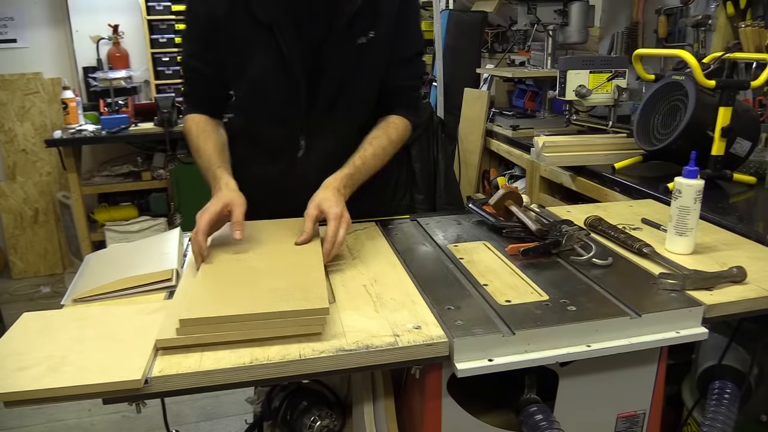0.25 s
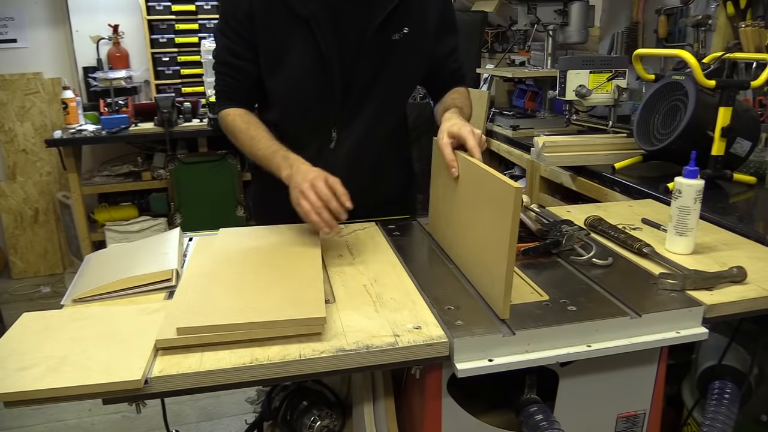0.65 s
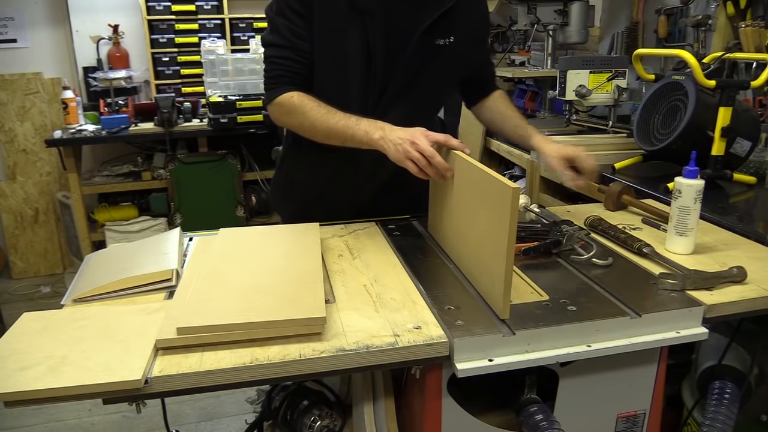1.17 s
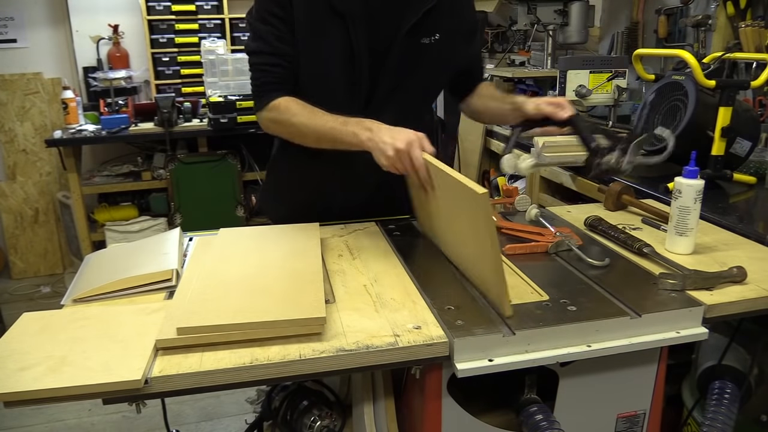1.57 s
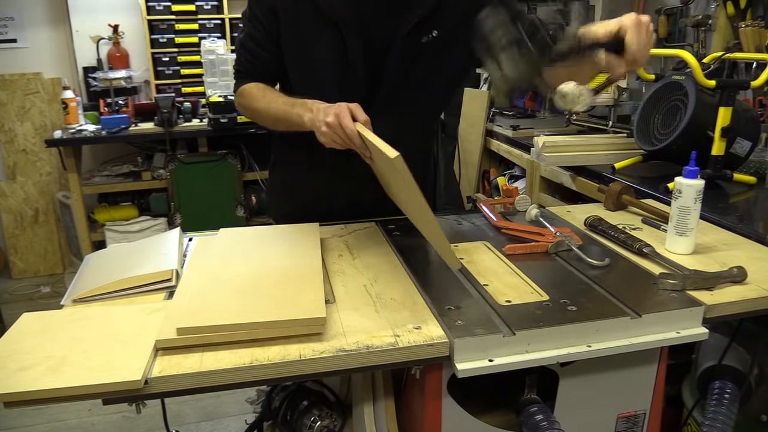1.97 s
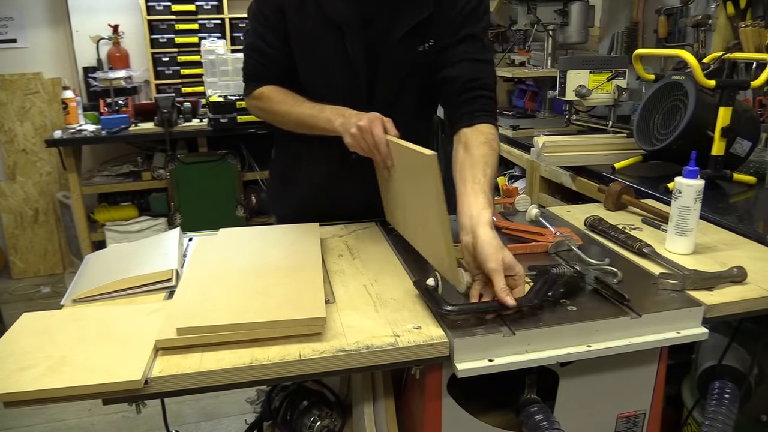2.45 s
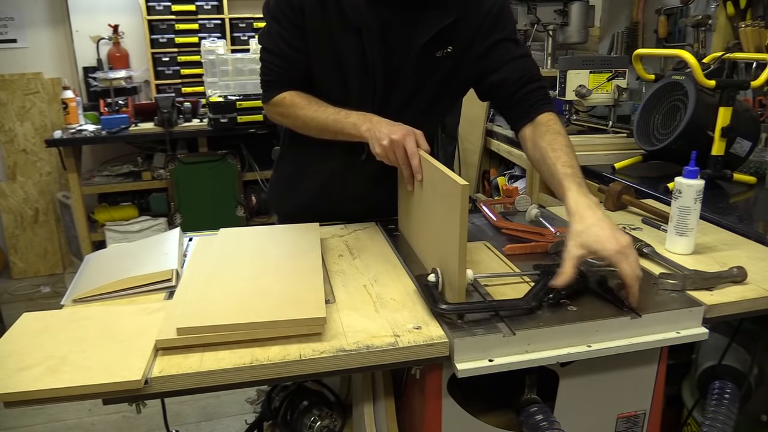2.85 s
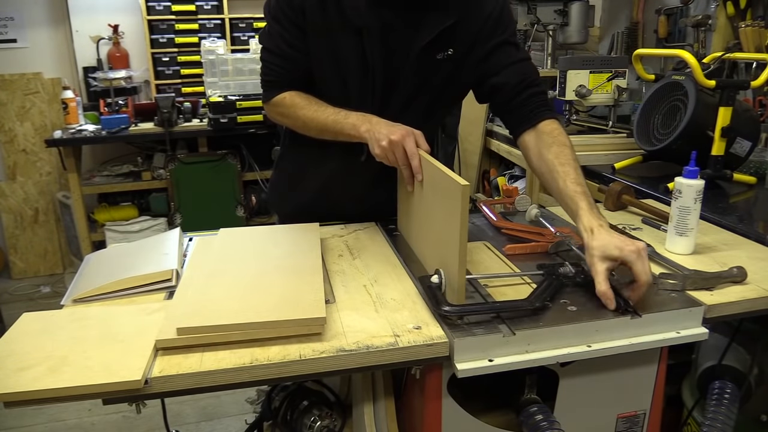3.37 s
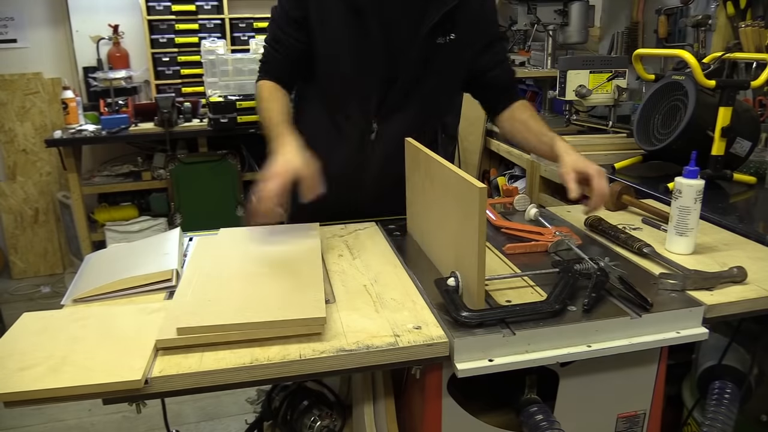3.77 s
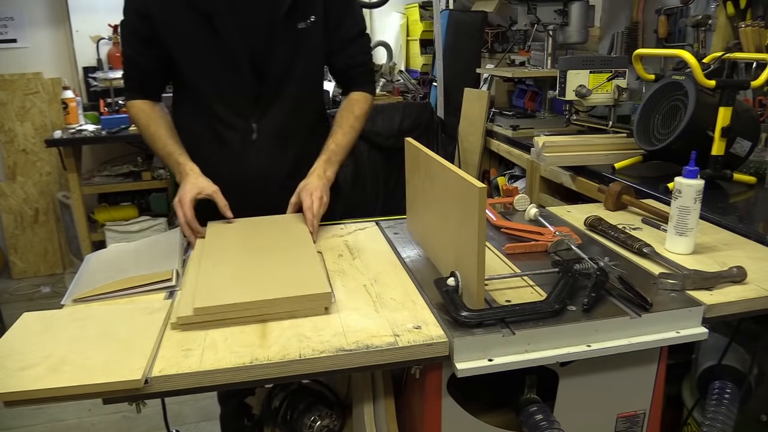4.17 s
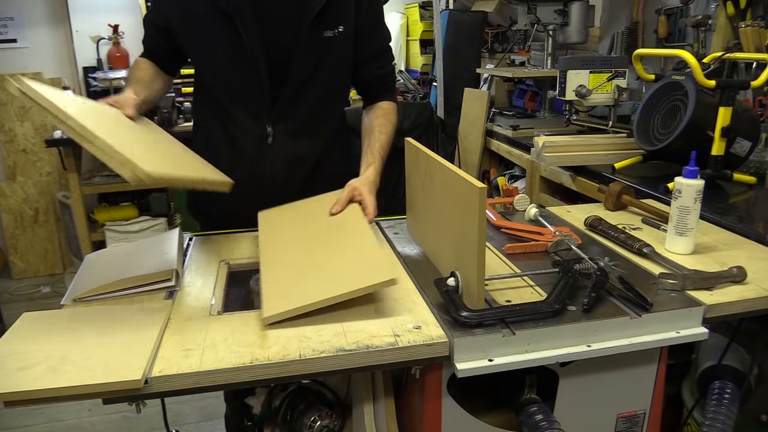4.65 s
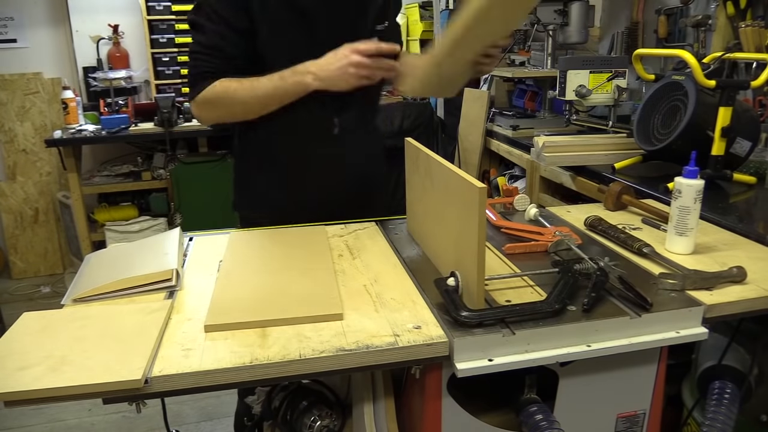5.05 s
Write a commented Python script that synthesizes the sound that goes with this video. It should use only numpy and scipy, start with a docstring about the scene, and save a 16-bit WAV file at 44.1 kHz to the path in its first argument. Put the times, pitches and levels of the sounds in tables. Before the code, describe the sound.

A fibreboard panel brushes off a stack and knocks several times as it is stood on an iron saw table. Steel clamps are picked up, their loose handles clinking, then set down and scraped over the iron in short jerks, the hollow cabinet booming softly below. More panels slide with a hiss, squeal briefly and clack together. The sounds are close and fairly dry, in a quiet workshop with a faint machine hum.

```python
"""Fibreboard panels slide off a stack on a wooden bench; one is stood on an iron saw table.
Each blow cracks, thuds and rings the table top; the hollow saw cabinet booms when pushed.
Steel clamps are picked up, clink their loose handles, are set down and scrape over the iron in
stick-slip jerks. More panels hiss off the stack, squeal at the edge and clack against each other.
Behind it all: a quiet workshop with a faint machine hum."""
import sys
import numpy as np
from scipy import signal
from scipy.fft import rfft, irfft, next_fast_len
from scipy.io import wavfile

SR = 44100
rng = np.random.default_rng(int(sys.argv[2]) if len(sys.argv) > 2 else 0)


def waveform_to_disk(signal):
    """Save audio, clipped to [-1, 1], as 16-bit WAV at the path in sys.argv[1]."""
    frames = np.transpose(np.atleast_2d(signal))
    scaled = np.clip(frames, -1, 1) * 32767
    samples = np.round(scaled).astype(np.int16)
    wavfile.write(sys.argv[1], SR, samples)


N = 234111
TIME_S = np.arange(N) / SR
AGE_S = TIME_S[:SR // 4]

# Table levels are relative: each source adds its own gain.
# room air spectrum: f/Hz, level/dB
AIR_SPECTRUM = [(25, -20), (50, -28), (100, -17.5), (200, -5), (300, -4.5), (480, 1.5), (600, -7), (690, 3),
                (800, -8.5), (1200, -6.5), (1700, -13.5), (5500, -15), (11000, -23), (16000, -28.5)]
# machine hum partials: f/Hz, level/dB
HUM_PARTIALS = [(140, -67), (275, -68.5), (301, -67), (484, -78.5)]
# panels and clamps hit bench and table (one faint row at 0.493 s is a gritty catch in a slide), harder =
# higher: t/s, crack/dB, centre/Hz, narrowness, thud/dB
KNOCKS = [(0.1176, -27, 5530, 1.07, -27), (0.224, -24, 4000, 1.2, -58), (.493, -46, 3500, 1.4, -55),
          (.6906, -18.5, 1710, 0.7, -17.5), (.724, -14.5, 1880, 0.98, -14.5),
          (1.0042, -31, 5900, 0.73, -37.5), (1.0123, -19.5, 11600, 0.6, -25.5),
          (1.1241, -6, 3830, 2.7, -21.5), (1.1789, -23, 6200, 0.7, -33), (1.39, -52, 2980, 0.52, -44),
          (1.4272, -16.5, 6000, 1.43, -19), (1.444, -17, 7300, 0.53, -20), (1.4495, -22, 5330, 1.7, -21.5),
          (1.5149, -14, 13800, 1.13, -22.5), (1.5405, -51, 9050, 1.4, -47), (2.4527, -13, 13900, 1.16, -42),
          (2.458, -11.5, 6500, 1.38, -25), (2.526, -45, 6050, 0.78, -44.5),
          (2.5762, -19.5, 9200, 1.14, -33), (2.5897, -9, 3800, 1.05, -16.5),
          (2.679, -28.5, 10800, 0.49, -39.5), (2.78, -34, 7500, 0.85, -48), (2.794, -22, 9900, 0.97, -53),
          (2.853, -27.5, 5300, 1.1, -33.5), (2.9811, -17, 15000, 1.12, -47),
          (3.033, -25.5, 10100, 0.68, -53), (3.1413, -18.5, 6300, 1.16, -34), (3.178, -19.5, 14500, 1, -53),
          (3.241, -26, 6500, 1.1, -53), (3.355, -28, 6500, 1.7, -32), (3.4908, -28.5, 5540, 0.86, -37),
          (3.5912, -24.5, 13100, 0.96, -61), (4.328, -46, 5000, 0.72, -37), (4.481, -40, 3000, 0.6, -37.5)]
# board hits board: t/s, crack/dB, centre/Hz, narrowness, thud/dB
CLACKS = [(4.059, -35.5, 4830, 1.7, -38), (4.7453, -21, 5300, 1.1, -58), (4.8111, -13, 6400, 1.18, -39),
          (4.831, -21, 6060, 1.3, -49), (4.841, -29.5, 3500, 1.1, -40), (4.8917, -17, 4600, 0.65, -23.5)]
# resonances and one notch common to all blows: f/Hz, width/Hz, gain/dB
BLOW_MODES = [(238, 22, 15.5), (520, 100, 2), (696, 110, 7), (1035, 560, -4.5), (1404, 61, 7),
              (2030, 310, 4), (3160, 430, 0.5), (4680, 340, 4.5)]
# crack bass roll-off: f/Hz, gain/dB
CRACK_ROLLOFF = [(40, -31), (300, -18.5), (1100, -1)]
# thud spectrum: f/Hz, level/dB
THUD_SPECTRUM = [(40, -33), (300, -20), (660, 2.5), (1100, -6), (3000, -37)]
# iron table top modes: f/Hz, level/dB, t60/s
TOP_MODES = [(254, -26, 0.13), (564, -17.5, 0.11), (655, -9.5, 0.075), (687.5, 1, 0.13), (668, -18.5, 0.78),
             (750, -14, 0.084)]
# panel edge drops on the stack: t/s, panel ring/dB, bench thump/dB
PANEL_DROPS = [(0.12, -44, -38), (4.748, -19, -51), (4.89, -18, -43)]
# pushes on the saw cabinet: peak t/s, level/dB
CABINET_PUSHES = [(.14, -48.5), (.73, -47.5), (1.13, -50.5), (1.451, -67), (2.52, -52), (2.62, -41.5),
                  (2.88, -45.5), (3.16, -46.5), (3.3, -37), (3.43, -40.5), (3.56, -48.5), (3.98, -53),
                  (4.2, -55), (4.48, -54), (4.92, -62.5)]
# hollow cabinet spectrum: f/Hz, level/dB
CABINET_SPECTRUM = [(25, -34), (50, -21), (66, -3), (76, 10.5), (90, -13), (117, -4), (150, -21),
                    (300, -45.5)]
# board or hand rubs board: peak t/s, rise/s, level/dB, tilt/(dB/oct)
SLIDES = [(0.239, .012, -26, -0.5), (0.316, 0.035, -39, -0.5), (.467, .026, -32.5, 1),
          (0.881, 0.078, -52, 1), (1.245, 0.044, -48, 1), (1.303, 0.016, -42.5, -3),
          (1.652, .022, -46, 4.5), (3.98, 0.042, -48, -4), (4.102, 0.016, -28, 6.5),
          (4.205, 0.04, -30, -1.5), (4.341, .014, -30, 5), (4.39, 0.025, -39.5, -1),
          (4.77, .009, -29, -0.5), (4.792, .017, -25.5, -0.5), (5.039, 0.077, -49, 9),
          (5.185, 0.038, -43.5, -3.5)]
# board friction spectrum: f/Hz, level/dB
RUB_SPECTRUM = [(130, -38.5), (215, -3.5), (290, -20.5), (450, -17.5), (1100, -10.5), (2000, -5.5),
                (4500, -1.5), (6500, 0.5), (9000, -5), (12000, -6.5), (16000, -14.5)]
# board resonances and notches: f/Hz, width/Hz, gain/dB
BOARD_MODES = [(685.3, 24.3, 20.5), (1895, 530, 4.5), (3560, 188, -8.5), (5650, 230, 1.5),
               (7070, 130, -5.5)]
# loose clamp handles strike: t/s, long handle/dB, short handle/dB, tick/dB
CLINKS = [(1.2186, -66, -56, -29), (1.54, -32, -26.5, -9), (1.702, -53, -70, -31.5),
          (1.7822, -51.5, -26, -24), (1.816, -36, -63, -24), (1.843, -46, -52, -14.5),
          (1.852, -46, -24.5, -13.5), (1.868, -41, -42, -15.5), (2.0263, -63, -58, -33),
          (2.0532, -50, -52, -21.5), (2.062, -45, -38, -29), (2.0736, -34, -47, -8.5),
          (2.1318, -52, -47, -22.5), (2.167, -35, -46, -21), (2.2, -32.5, -44.5, -22),
          (2.262, -55.5, -49.5, -27.5), (2.415, -48.5, -62, -30.5), (2.862, -62, -42, -38),
          (2.98, -50, -28.5, -30), (3.9293, -71, -77, -30.5), (4.0065, -67, -60, -28.5)]
# clamps rattle in the hand: start/s, end/s
RATTLE_SPANS = [(1.801, 1.93), (2.038, 2.26)]
# long handle modes: f/Hz, level/dB, t60/s
LONG_HANDLE_MODES = [(7290, 1, 0.14), (7420, -21, 0.09), (10630, -3.5, 0.053), (11500, -16.5, 0.024),
                     (14200, -7.5, 0.06)]
# short handle modes: f/Hz, level/dB, t60/s
SHORT_HANDLE_MODES = [(9900, -27, 0.057), (10730, 3, 0.091), (11710, 7.5, 0.038), (13000, -2.5, 0.14),
                      (14200, 0.5, 0.094), (15200, -13, .04)]
# handle-on-screw tick spectrum: f/Hz, level/dB
TICK_SPECTRUM = [(1000, -44), (2500, -7.5), (4500, -1.5), (8000, -0.5), (12000, 3.5), (16000, 2)]
# clamp jerks over iron: t/s, time to catch/s, break/dB, catch/dB, frame ring/Hz
JERKS = [(2.566, .006, -38, -44, 1470), (2.861, 0.01, -25, -26.5, 1474), (2.991, 0.035, -24.5, -33.5, 2180),
         (3.045, 0.03, -34, -38, 2180), (3.127, 0.059, -16, -37, 2140), (3.249, .055, -12, -21, 1164),
         (3.362, 0.0077, -15.5, -29, 1470), (3.396, 0.025, -14, -22, 1656), (3.424, .005, -20, -20.5, 1153),
         (3.512, 0.03, -16, -29, 2065), (3.599, 0.025, -24.5, -23, 1182), (3.709, 0.022, -34.5, -32, 1394)]
# steel-on-iron spectrum: f/Hz, level/dB
SCRAPE_SPECTRUM = [(200, -18.5), (500, -18.5), (700, -4), (1100, -14.5), (2200, -3), (4000, -10),
                   (6000, -2.5), (9000, -8.5), (13000, -5), (16000, -8)]
# steel-on-iron resonances: f/Hz, width/Hz, gain/dB
SCRAPE_MODES = [(2475, 45, 2), (3020, 48, 3), (3544, 130, 10.5), (4330, 130, 12), (5360, 370, 8),
                (6990, 110, 6)]
# shaken clamp frame spectrum: f/Hz, level/dB
JUDDER_SPECTRUM = [(100, -30), (250, -9), (500, -11), (700, 0.5), (950, -5), (1400, 0.5), (2200, 0.5),
                   (3200, -11.5), (6000, -17.5)]
# friction of a panel drawn off the stack: t/s, level/dB
PULL_ENVELOPE = [(4.44, -45), (4.458, -34.5), (4.518, -39), (4.544, -30.5), (4.562, -45.5), (4.584, -23.5),
                 (4.632, -15.5), (4.676, -20), (4.7, -64)]
# board edge squeals: peak t/s, rise/s, level/dB, f/Hz, relative pitch sink/(1/s)
SQUEALS = [(4.599, 0.024, -22.5, 6160, 0.1), (4.63, .008, -13.5, 6060, 0.17), (4.65, .02, -19, 4476, 1.4),
           (4.66, 0.012, -31, 3500, 0.5), (4.783, .017, -26.5, 2480, 0.073), (4.813, 0.0032, -15, 6050, 0)]
# room decay: f/Hz, t60/s
ROOM_DECAY = [(100, 0.17), (600, 0.23), (1500, 0.13), (4000, 0.095), (14000, 0.17)]
# room echo spectrum: f/Hz, level/dB
ROOM_SPECTRUM = [(100, 10.5), (600, 2), (1500, 3.5), (4000, 5.5), (14000, -12.5)]


def from_db(db):
    """Decibels to gain."""
    return 10 ** (np.asarray(db) / 20)


def unit_rms(x):
    """Scale to rms 1."""
    return x / np.sqrt(np.mean(x ** 2) + 1e-20)


def at_hz(points, hz):
    """Interpolate over log frequency."""
    f, value = np.transpose(points)
    return np.interp(np.log(hz + 1e-9), np.log(f), value)


def decay(t, t60_s):
    """Exponential decay."""
    return np.exp(-np.log(1000) * t / max(t60_s, 1e-3))


def add(out, t_s, sound):
    """Mix a sound in at t_s."""
    at = int(round(t_s * SR))
    out[at:at + len(sound)] += sound[:N - at]


def ring(hz, t60_s):
    """One struck mode."""
    t = TIME_S[:SR * 2 // 3]
    return np.sin(2 * np.pi * hz * t) * decay(t, t60_s)


def resonate(x, spectrum, modes=(), tilt_db_oct=0, ripple_db=0, ripple_hz=109.55):
    """Drive a body: broad spectrum, main resonances, random minor modes; rms 1."""
    size = 2 * next_fast_len(len(x) // 2 + 1)
    hz = np.arange(size // 2 + 1) * SR / size
    db = at_hz(spectrum, hz) + tilt_db_oct * np.log2(1 + hz / 1000)
    # minor modes vary with the contact point and widen with frequency
    mode_index = np.sqrt(hz * 4000) / ripple_hz
    ripple = np.clip(rng.standard_normal(1000), -2, 2)
    db += ripple_db * np.interp(mode_index, np.arange(len(ripple)), ripple)
    for centre_hz, width_hz, peak_db in modes:
        detuning = 2 * (hz - centre_hz) / width_hz
        db += 10 * np.log10(1 + (from_db(peak_db) ** 2 - 1) / (1 + detuning ** 2))
    # minimum phase: no ringing before the touch
    cepstrum = irfft(np.log(from_db(db)))
    response = np.exp(2 * rfft(cepstrum[:size // 2], size))
    return unit_rms(irfft(rfft(x, size) * response, size)[:len(x)])


def stick_slip(rate_hz, t60_s, sliding):
    """0.5 s of friction noise: uneven slips over a steady sliding part."""
    n = SR // 2
    gaps, sizes = rng.random((2, 400)) + 0.5
    at = (np.cumsum(gaps) / rate_hz * SR).astype(int)
    slips = np.zeros(n)
    slips[at[at < n]] = sizes[at < n]
    envelope = signal.fftconvolve(slips, decay(AGE_S, t60_s))[:n] + sliding
    return envelope * rng.standard_normal(n)


def stroke(grain, peak_s, rise_s, fall_s, db, spectrum, modes, **colour):
    """One push: friction swells and dies through a body. Returns start/s, sound."""
    start_s = max(peak_s - 3 * rise_s, 0)
    t = TIME_S[:len(grain)] + start_s - peak_s
    swell = np.exp(-np.where(t < 0, (t / rise_s) ** 2, t / fall_s))
    gain = from_db(db) * np.sqrt(np.mean(swell ** 2))
    return start_s, gain * resonate(grain * swell, spectrum, modes, **colour)


def room_air(level_db=-55.5):
    """Still air: steady, dull noise."""
    return from_db(level_db) * resonate(rng.standard_normal(N), AIR_SPECTRUM)


def machine_hum(wander_hz=5.9, wander_db=1.5):
    """Faint low partials whose level wanders."""
    hum = sum(from_db(db) * np.sqrt(2) * np.sin(2 * np.pi * (hz * TIME_S + rng.random()))
              for hz, db in HUM_PARTIALS)
    wander = np.interp(TIME_S * wander_hz, np.arange(1000), rng.standard_normal(1000))
    return hum * unit_rms(from_db(wander_db * wander))


def crack_spectrum(centre_hz, narrowness, rise_db_oct=6, fall_db_oct=9.5, skirt_db=-28.5):
    """Hump at the pitch set by contact time; narrowness scales its slopes. Rows: f/Hz, level/dB."""
    hz = np.geomspace(40, 20000, 80)
    octaves = np.log2(hz / centre_hz)
    hump_db = narrowness * np.minimum(rise_db_oct * octaves, -fall_db_oct * octaves)
    density_db = np.maximum(hump_db, skirt_db) - 10 * np.log10(hz)
    return np.column_stack([hz, density_db + at_hz(CRACK_ROLLOFF, hz)])


def blows(knock_t60_s=0.098, clack_t60_s=0.064, firm_db=-14.5, damping_per_db=0.16):
    """Knocks and clacks excite dense modes: contact snap, hard crack, damped body."""
    out = np.zeros(N)
    burst_gain = np.sqrt(0.01 / AGE_S[-1])   # energy of 10 ms at rms 1
    snap = from_db(3.5) * decay(AGE_S, t60_s=0.0011)
    crack = decay(AGE_S, t60_s=0.0051)
    for hits, free_t60_s in (KNOCKS, knock_t60_s), (CLACKS, clack_t60_s):
        for t_s, crack_db, centre_hz, narrowness, thud_db in hits:
            # firm blows press the parts together and die sooner
            body_t60_s = free_t60_s * np.exp(-damping_per_db * max(crack_db - firm_db, 0))
            envelope = snap + crack + from_db(-1) * decay(AGE_S, body_t60_s)
            layers = (crack_db, crack_spectrum(centre_hz, narrowness)), (thud_db - 5, THUD_SPECTRUM)
            for db, spectrum in layers:
                force = rng.choice([-1., 1.], len(AGE_S)) * envelope
                cloud = resonate(force, spectrum, BLOW_MODES, ripple_db=4, ripple_hz=69.94)
                add(out, t_s, from_db(db) * burst_gain * cloud)
    return out


def table_ring(gain_db=-6.5):
    """Each knock's thud rings the low modes of the iron top."""
    out = np.zeros(N)
    for t_s, *_, thud_db in KNOCKS:
        for hz, db, t60_s in TOP_MODES:
            add(out, t_s, from_db(thud_db + gain_db + db + rng.normal(0, 1)) * ring(hz, t60_s))
    return out


def panel_drops():
    """An edge lands on the stack: the hand-damped panel rings, the bench thumps."""
    out = np.zeros(N)
    for t_s, panel_db, bench_db in PANEL_DROPS:
        add(out, t_s, from_db(panel_db) * ring(hz=1085, t60_s=0.042))
        add(out, t_s, from_db(bench_db) * ring(hz=108, t60_s=0.64))
    return out


def cabinet_boom(rise_s=0.04, t60_s=0.73, floor_db=-69):
    """The hollow cabinet booms at each push, over a faint steady rumble."""
    power = from_db(floor_db) ** 2
    for peak_s, db in CABINET_PUSHES:
        attack = np.exp(-(np.minimum(TIME_S - peak_s, 0) / rise_s) ** 2)
        release = decay(np.maximum(TIME_S - peak_s, 0), t60_s)
        power = power + (from_db(db) * attack * release) ** 2
    return np.sqrt(power) * resonate(rng.standard_normal(N), CABINET_SPECTRUM)


def panel_slides(fall_ratio=0.89):
    """Fibres brush past each other: fine hiss coloured by the boards."""
    out = np.zeros(N)
    for peak_s, rise_s, db, tilt_db_oct in SLIDES:
        grain = stick_slip(rate_hz=240, t60_s=0.006, sliding=0.85)
        add(out, *stroke(grain, peak_s, rise_s, fall_ratio * rise_s, db, RUB_SPECTRUM, BOARD_MODES,
                         tilt_db_oct=tilt_db_oct, ripple_db=2))
    return out


def handle_clinks(strikes, settle_s=0.04, spread_db=4.1, detune=0.0031, tick_gain_db=-25.5):
    """Sliding handles tick against their screws and ring high until they settle."""
    out = np.zeros(N)
    tick_envelope = decay(AGE_S, t60_s=0.0046) + from_db(-11) * decay(AGE_S, t60_s=0.073)
    settling = np.exp(-(AGE_S / settle_s) ** 2)
    for t_s, long_db, short_db, tick_db in strikes:
        for handle_db, modes in (long_db, LONG_HANDLE_MODES), (short_db, SHORT_HANDLE_MODES):
            for hz, db, t60_s in modes:
                gain = from_db(handle_db + db + rng.normal(0, spread_db))
                note = ring(hz * rng.normal(1, detune), t60_s)[:len(AGE_S)]
                add(out, t_s, gain * note * settling)
        tick = resonate(rng.standard_normal(len(AGE_S)) * tick_envelope, TICK_SPECTRUM, ripple_db=5.5)
        add(out, t_s, from_db(tick_db + tick_gain_db) * tick)
    return out


def handle_rattles(rate_hz=25, tick_db=-35, spread_db=3, ring_db=-18):
    """Handled parts touch faintly at uneven times. Rows as in CLINKS."""
    rows = []
    for start_s, end_s in RATTLE_SPANS:
        gaps = rng.random(30) + 0.5
        times_s = start_s + (np.cumsum(gaps) - 1) / rate_hz
        levels_db = rng.normal(tick_db, spread_db, 30)
        rows += [(t, db + ring_db, db + ring_db, db) for t, db in zip(times_s, levels_db) if t < end_s]
    return rows


def clamp_scrapes(rise_s=0.009, break_fall_s=0.011, catch_fall_s=0.009, tilt_per_db=0.24,
                  frame_width_hz=53, frame_db=15):
    """Steel on iron breaks free, drags, catches; the catch shakes the frame, which hums on."""
    out = np.zeros(N)
    mean_break_db = np.mean([row[2] for row in JERKS])
    for t_s, drag_s, break_db, catch_db, frame_hz in JERKS:
        catch_s = t_s + drag_s
        half_s = max(drag_s / 2, rise_s)
        breaking = (t_s, rise_s, break_fall_s, break_db)
        dragging = (t_s + drag_s / 2, half_s, half_s, break_db - 12)
        catching = (catch_s, rise_s, catch_fall_s, catch_db - 1)
        speed_db_oct = tilt_per_db * (break_db - mean_break_db)   # faster = brighter
        for phase, phase_db_oct in (breaking, -1), (dragging, -4.5), (catching, -3):
            grain = stick_slip(rate_hz=220, t60_s=0.0029, sliding=0.35)
            add(out, *stroke(grain, *phase, SCRAPE_SPECTRUM, SCRAPE_MODES,
                             tilt_db_oct=phase_db_oct + speed_db_oct, ripple_db=6.5, ripple_hz=70.2))
        judder = stick_slip(rate_hz=200, t60_s=0.0032, sliding=0.28)
        add(out, *stroke(judder, catch_s, rise_s, catch_fall_s, catch_db, JUDDER_SPECTRUM,
                         [(frame_hz, frame_width_hz, frame_db)], ripple_db=2))
        add(out, catch_s, from_db(catch_db - 29) * ring(hz=1420, t60_s=0.82))
    return out


def panel_pull(gain_db=-1, speed_range_db=21, fast_db_oct=5, slow_db_oct=2.06):
    """Long slide off the stack: the hiss grows louder and brighter with speed."""
    out = np.zeros(N)
    times_s, levels_db = np.transpose(PULL_ENVELOPE)
    db = np.interp(TIME_S[:SR // 2] + times_s[0], times_s, levels_db, right=-120)
    slowness = np.clip((levels_db.max() - db) / speed_range_db, 0, 1)
    for share, tilt_db_oct in (1 - slowness, fast_db_oct), (slowness, slow_db_oct):
        grain = stick_slip(rate_hz=240, t60_s=0.0035, sliding=0.83)
        hiss = resonate(grain, RUB_SPECTRUM, BOARD_MODES, tilt_db_oct, ripple_db=1)
        add(out, times_s[0], from_db(gain_db + db) * np.sqrt(share) * hiss)
    return out


def edge_squeals(width_hz=100, resonance_db=44, fall_ratio=0.89):
    """A board edge sings: friction drives a narrow resonance of sinking pitch."""
    out = np.zeros(N)
    for peak_s, rise_s, db, hz, sink_per_s in SQUEALS:
        friction = rng.standard_normal(SR // 2)
        start_s, note = stroke(friction, peak_s, rise_s, fall_ratio * rise_s, db, RUB_SPECTRUM,
                               [(hz, width_hz, resonance_db)])
        t = TIME_S[:len(note)] + start_s - peak_s
        add(out, start_s, np.interp(t - sink_per_s * t ** 2 / 2, t, note))
    return out


def workshop_reverb(x, wet_db=-17, first_echo_s=0.008):
    """Cluttered room: short diffuse echoes, decaying per octave band."""
    t = TIME_S[:SR // 2]
    tail = np.zeros(len(t))
    for low_hz in 62.5 * 2 ** np.arange(8):
        mid_hz = low_hz * np.sqrt(2)
        octave = signal.butter(2, [low_hz, 2 * low_hz], "band", fs=SR, output="sos")
        band = signal.sosfilt(octave, rng.standard_normal(len(t)))
        tail += band * from_db(at_hz(ROOM_SPECTRUM, mid_hz)) * decay(t, at_hz(ROOM_DECAY, mid_hz))
    tail *= t > first_echo_s
    return x + from_db(wet_db) * signal.fftconvolve(x, tail / np.linalg.norm(tail))[:N]


def scene():
    """All sources in the room, same on both channels."""
    background = room_air() + machine_hum() + cabinet_boom()
    impacts = blows() + table_ring() + panel_drops()
    friction = clamp_scrapes() + panel_slides() + edge_squeals() + panel_pull()
    handles = handle_clinks(CLINKS + handle_rattles())
    mono = background + workshop_reverb(impacts + friction + handles)
    return np.array([mono, mono])


def record(dry, ceiling=0.95, low_cut_hz=56, high_cut_hz=16000):
    """Low cut, soft clip, steep high cut."""
    highpass = signal.butter(2, low_cut_hz, "high", fs=SR, output="sos")
    lowpass = signal.ellip(10, 0.2, 70, high_cut_hz, fs=SR, output="sos")
    rounded = ceiling * np.tanh(signal.sosfilt(highpass, dry) / ceiling)
    return signal.sosfilt(lowpass, rounded)


dry = scene()
out = record(dry)
waveform_to_disk(out)
```